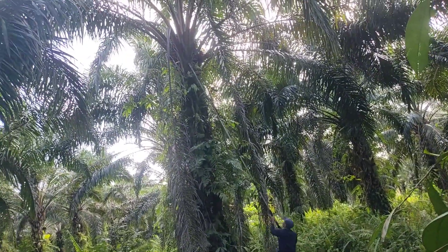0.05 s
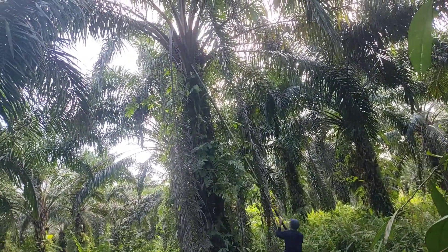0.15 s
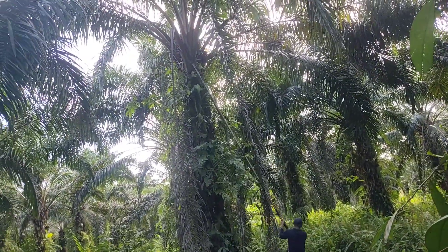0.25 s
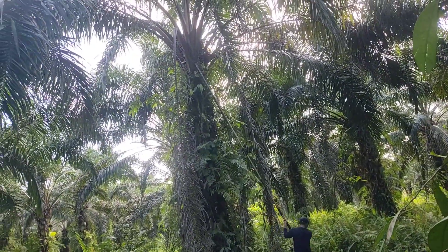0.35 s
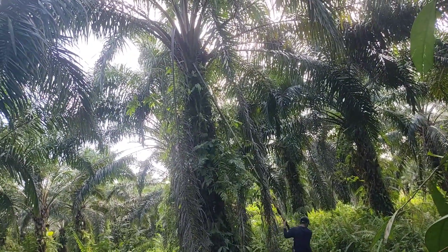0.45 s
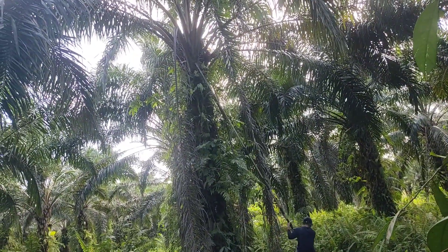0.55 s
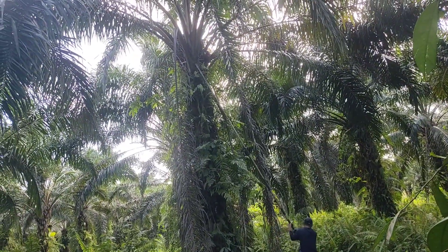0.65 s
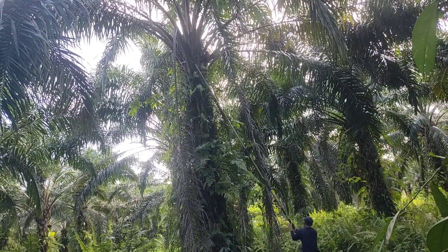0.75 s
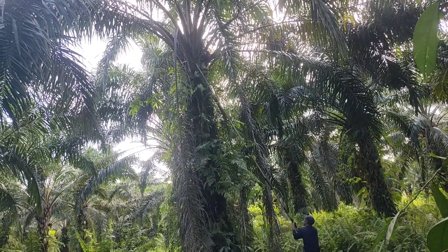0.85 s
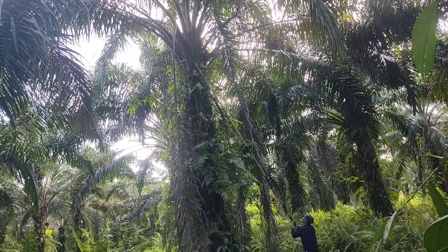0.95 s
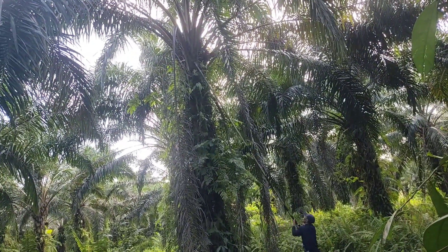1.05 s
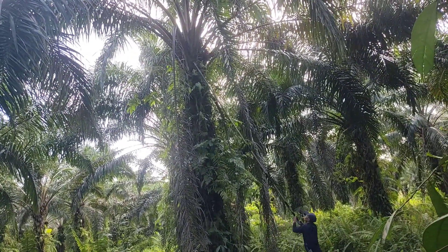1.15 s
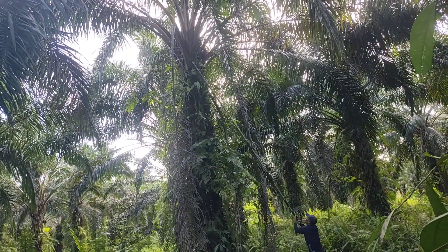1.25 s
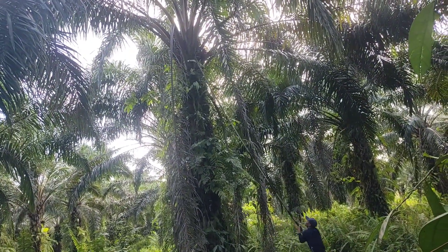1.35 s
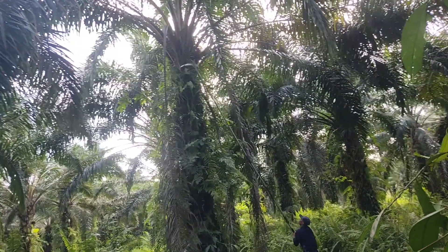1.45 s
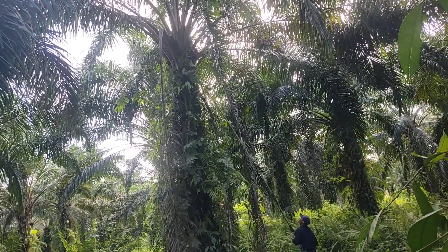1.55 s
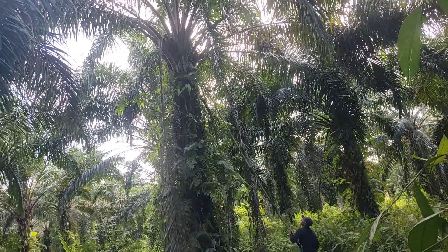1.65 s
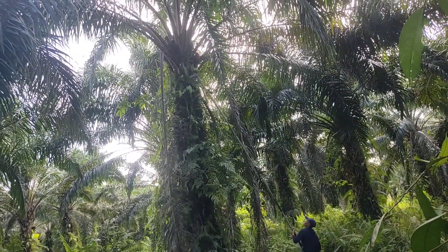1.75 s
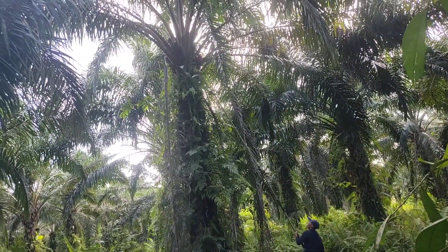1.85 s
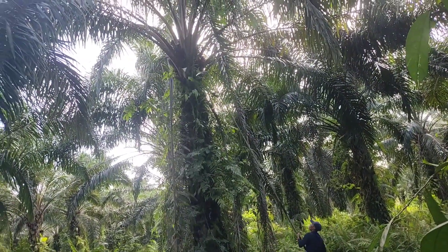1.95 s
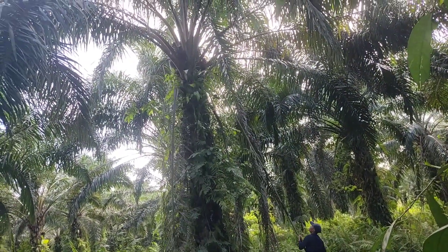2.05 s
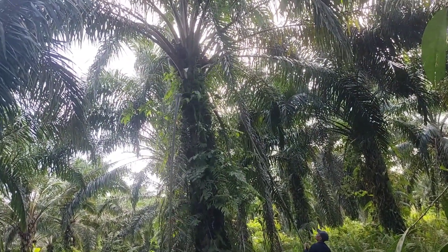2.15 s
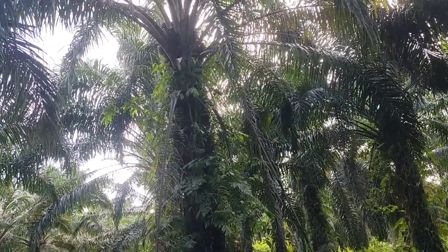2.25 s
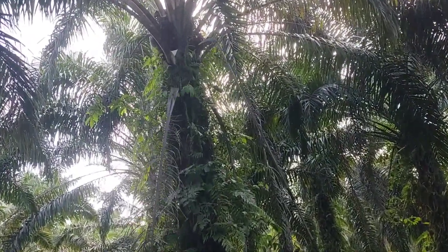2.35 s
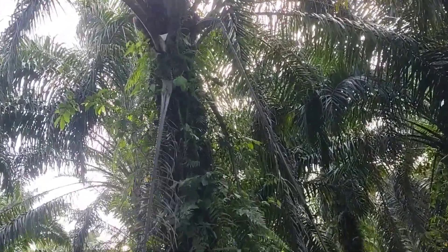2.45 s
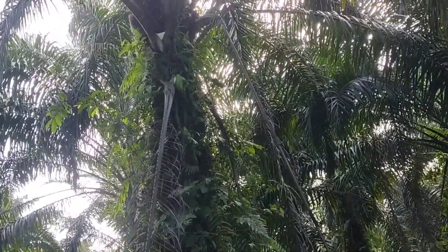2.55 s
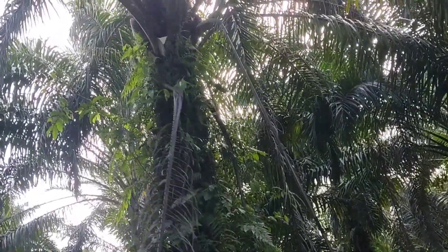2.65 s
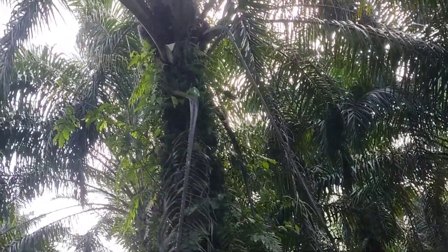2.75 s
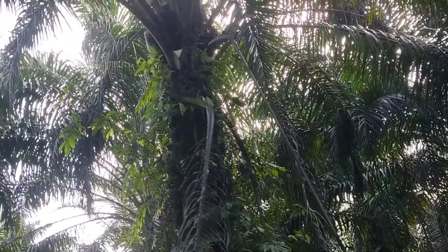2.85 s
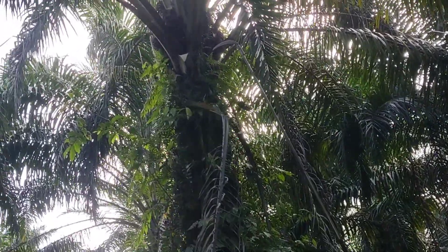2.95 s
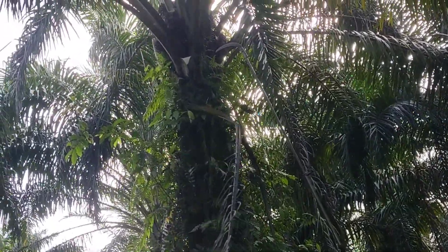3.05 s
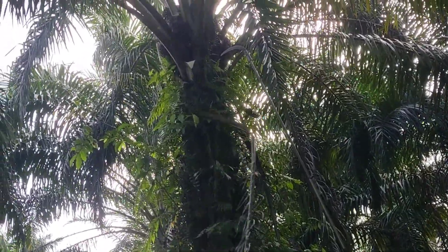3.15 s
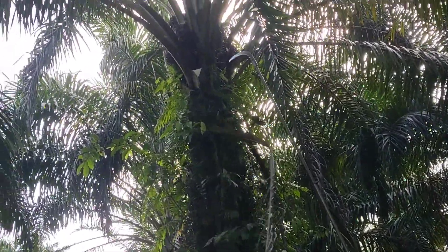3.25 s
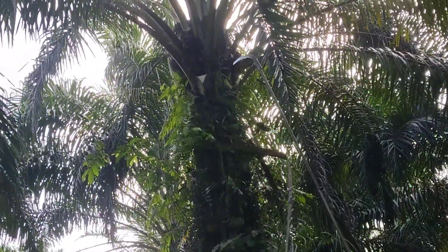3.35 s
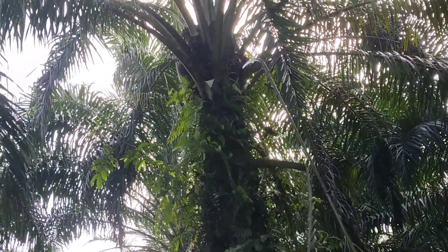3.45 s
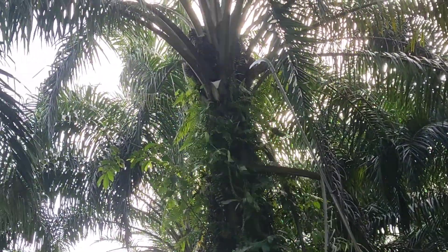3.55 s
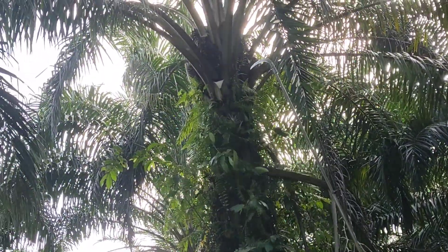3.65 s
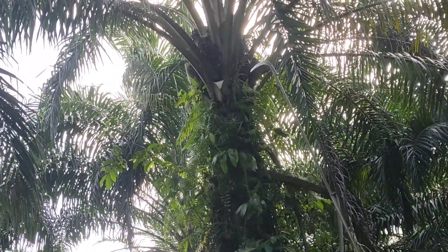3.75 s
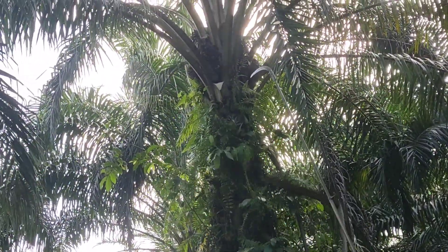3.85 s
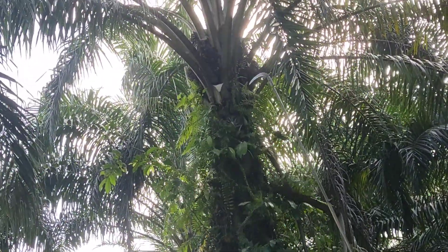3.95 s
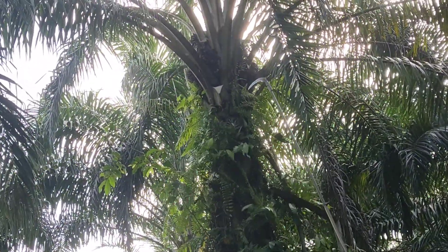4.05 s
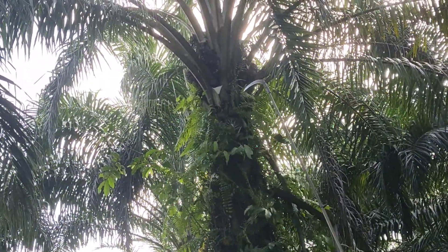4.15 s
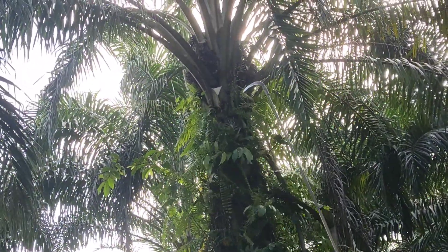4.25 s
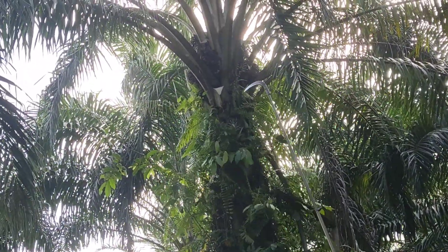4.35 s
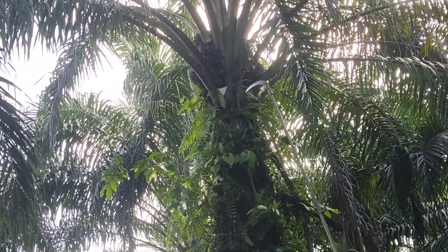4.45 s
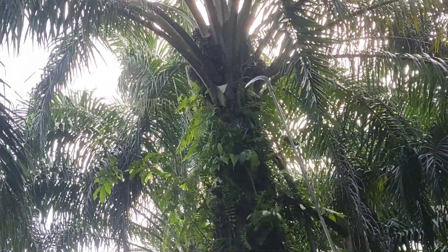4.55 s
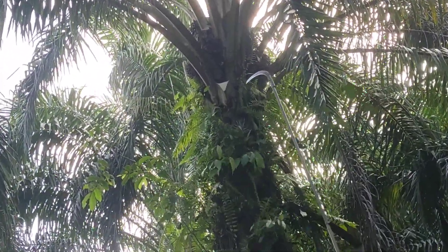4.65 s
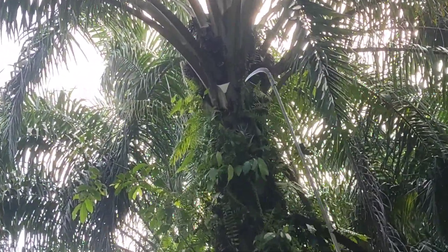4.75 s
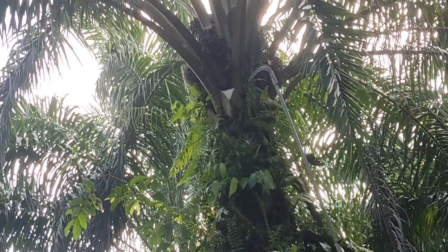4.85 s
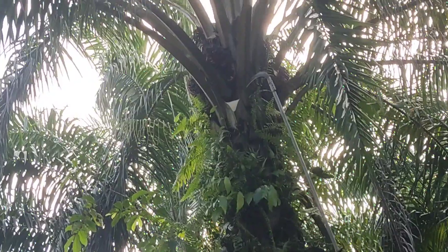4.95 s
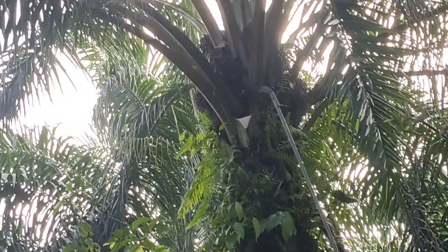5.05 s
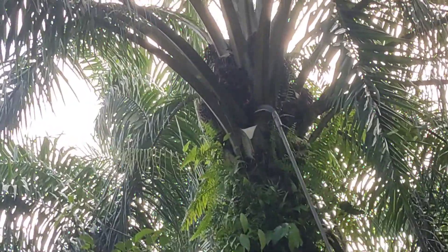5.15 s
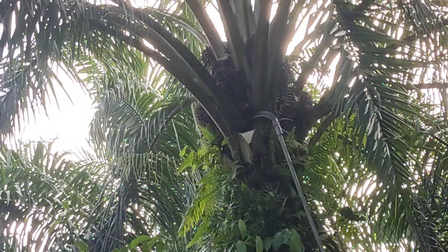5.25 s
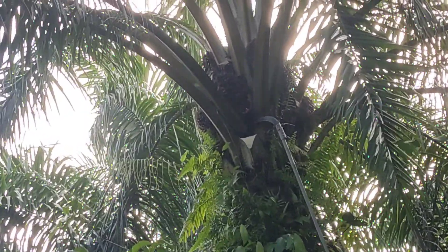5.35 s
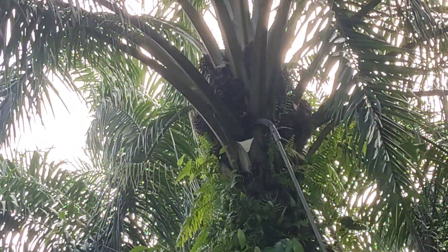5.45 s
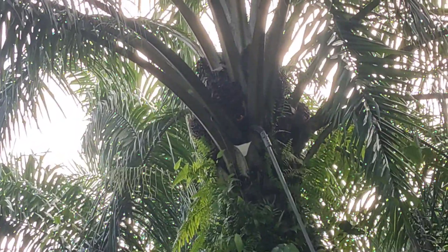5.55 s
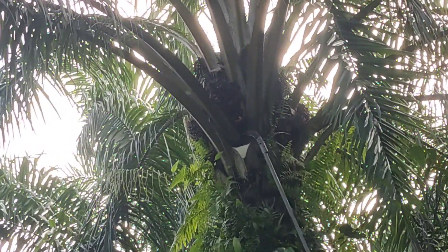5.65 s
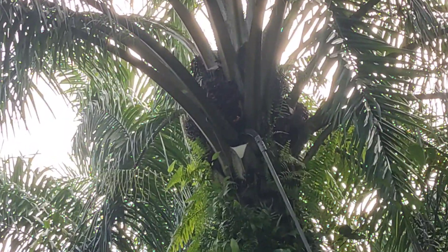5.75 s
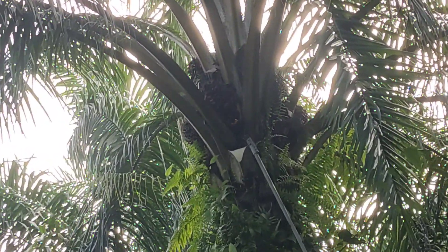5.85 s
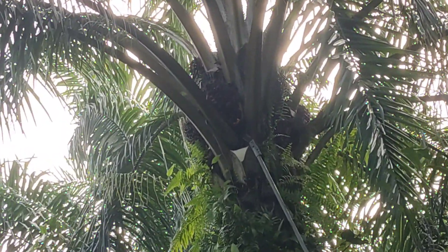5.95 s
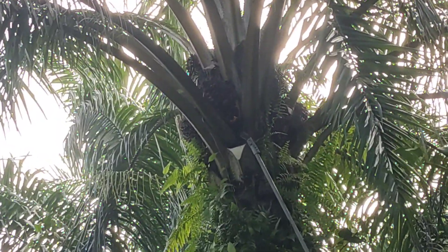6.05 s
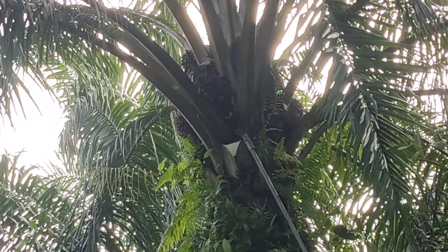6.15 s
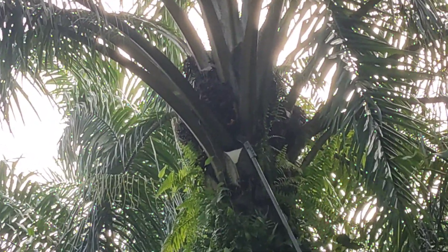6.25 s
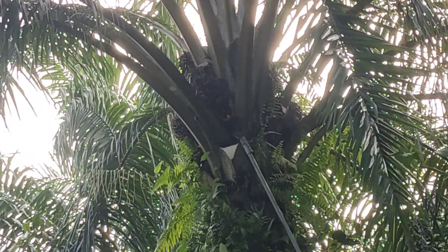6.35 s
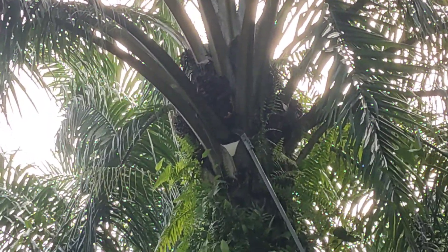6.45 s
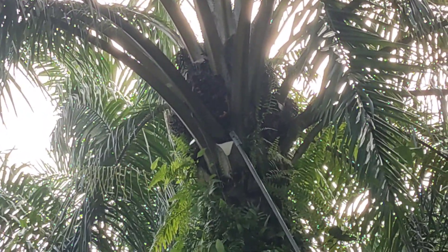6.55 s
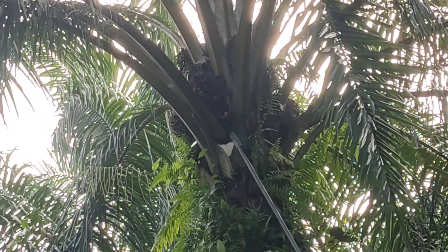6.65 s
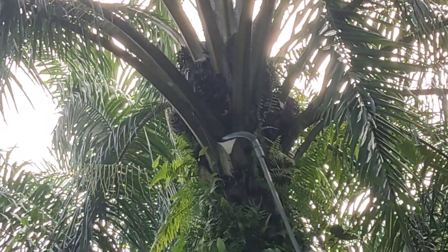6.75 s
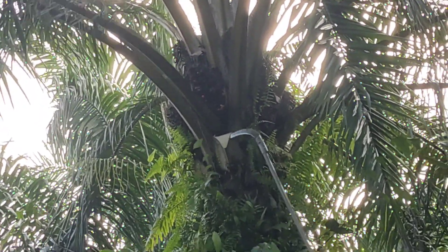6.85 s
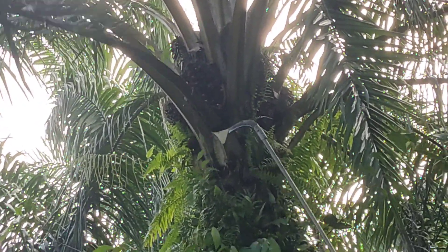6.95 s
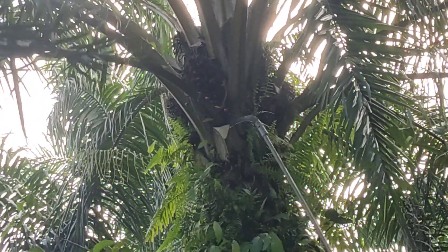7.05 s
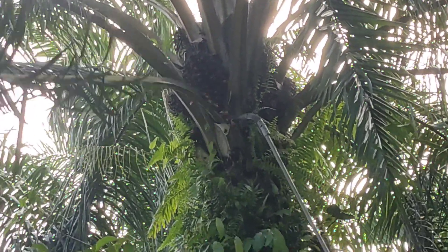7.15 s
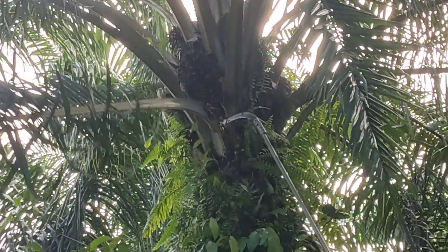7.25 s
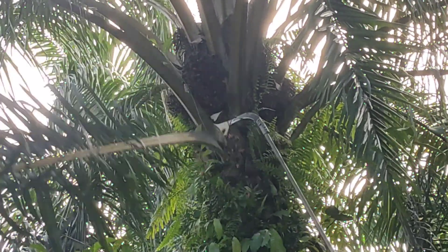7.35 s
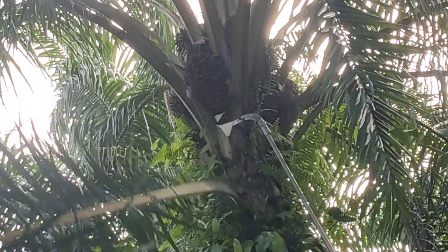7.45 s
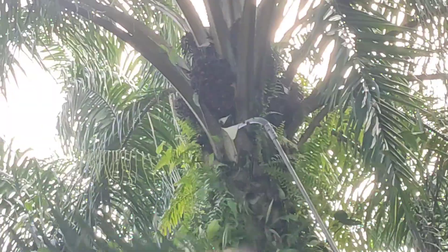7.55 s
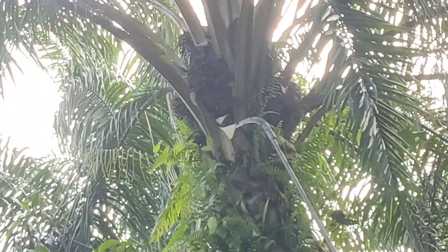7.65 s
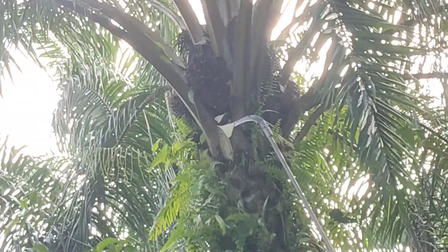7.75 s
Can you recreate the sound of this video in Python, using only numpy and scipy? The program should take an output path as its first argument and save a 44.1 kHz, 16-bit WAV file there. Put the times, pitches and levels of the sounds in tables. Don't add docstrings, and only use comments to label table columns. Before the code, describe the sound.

A steady, high, shimmering cicada drone fills a palm plantation throughout, with faint far-leaf hiss and very light wind. At 0.1 s a woody knock with a dull thump comes from the crown about ten metres off, then small faint taps. From 1.35 to 2.4 s the pole sickle bites: rapid dry ticks, crunching rips and bright snaps, loudest around 1.65 to 2.0 s, with brief metallic-woody ringing and rustling leaflets. Lighter clacks follow from 2.7, a thud at 3.3, and leafy rustle with sharp ticks and snaps from 3.6 to 4.6 s, including a hollow knock at 4.55. It quiets near 5 s, with soft scrapes, small splits and knocks until 6.5. At 6.7 to 7.0 s a dense, loud splintering tear breaks out with thumps, then leaves swish and rustle, with scattered knocks and a short scrape around 7.7 s. Short diffuse woodland reverberation; phone sound, little bass.

```python
import sys
import numpy as np
from scipy import signal
from scipy.fft import rfft, irfft, next_fast_len
from scipy.io import wavfile
from scipy.ndimage import uniform_filter1d, map_coordinates

SR = 44100
rng = np.random.default_rng(int(sys.argv[2]) if len(sys.argv) > 2 else 0)


def log_audio(samples):
    frames = np.atleast_2d(samples).T
    limited = np.clip(frames, -1, 1)
    pcm = np.round(limited * 32767).astype(np.int16)
    wavfile.write(sys.argv[1], SR, pcm)


def nominal_scale(level):
    x = np.asarray(level, float) / 20
    return 10 ** x


N = 344421
FAST = next_fast_len(N, True)

# (frequency [Hz], level [dB])
EDGE_COLOUR = [(4200, -29.5), (5300, -5), (6500, -8.5), (7500, -3), (8800, -10), (9600, -17.5),
               (10500, -26), (12500, -19.5), (14500, -22.5), (15800, -60)]
# (frequency [Hz], level [dB])
CRUNCH_COLOUR = [(250, -36), (600, -2), (1100, 3), (2200, 5), (3300, 8.5), (4300, 2), (6000, -34.5)]
# (frequency [Hz], common share [0-1])
CROWN_LIKENESS = [(100, 1), (1000, 0.78), (1500, 0.41), (2300, 0.65), (3500, 0.27), (6000, 0)]


def shape(table, size):
    hz, value = np.transpose(table)
    bins = np.maximum(np.fft.rfftfreq(size, 1 / SR), 1)
    return np.interp(np.log(bins), np.log(hz), value)


def colour(x, table):
    hz = np.fft.rfftfreq(FAST, 1 / SR)
    inside = (hz > table[0][0]) * (hz < table[-1][0])
    y = irfft(rfft(x, FAST) * nominal_scale(shape(table, size=FAST)) * inside, FAST)[..., :N]
    return y / np.sqrt(np.mean(y ** 2))


def causal(db):
    cepstrum = irfft(np.log(nominal_scale(db)))
    half = cepstrum.shape[-1] // 2
    cepstrum[..., 1:half] *= 2
    cepstrum[..., half + 1:] = 0
    return np.exp(rfft(cepstrum))


def walk(rate):
    k = int(SR / rate)
    held = np.repeat(rng.standard_normal(N // k + 1), k)
    return 0.96 * uniform_filter1d(uniform_filter1d(held, k), k)[:N]


def grains(rate, spread_db):
    out = np.zeros(3 * N)
    at = rng.integers(3 * N, size=int(3 * N * rate / SR))
    sign, size = rng.standard_normal((2, len(at)))
    out[at] = sign * nominal_scale(spread_db * size)
    return out.reshape(3, N)


def pair(three, like):
    share = np.clip(shape(like, size=FAST), 0, 1)
    spec = rfft(three, FAST)
    return irfft(np.sqrt(share) * spec[0] + np.sqrt(1 - share) * spec[1:], FAST)[:, :N]


def ring(modes, weight, wobble, size):
    hz, db, t60 = np.transpose(modes)
    decay = np.log(1000) / (t60 * SR)
    pole = np.exp(2j * np.pi * hz * wobble / SR - decay)[..., None]
    delay = np.exp(-2j * np.pi * np.arange(size // 2 + 1) / size)
    resonance = pole.imag * delay / ((1 - pole * delay) * (1 - pole.conj() * delay))
    return np.sum((nominal_scale(db) * weight)[..., None] * resonance, axis=1)


def peak_one(x):
    return x / np.max(np.abs(x), axis=-1, keepdims=True)


def place(times, sounds):
    size = sounds.shape[-1]
    out = np.zeros(N + size)
    for start, sound in zip(times, sounds):
        out[int(start * SR):int(start * SR) + size] += sound
    return out[:N]


def blow_rows():
    # (time [s], peak [dB], centre [Hz], length [ms], thud [dB])
    thumps = [(.094, -28, 804, 13.8, -10.5), (.347, -50, 1064, 7.4, -8), (.805, -63.5, 590, 14.3, 14),
              (.991, -51, 450, 2.9, -6), (1.187, -47.5, 1563, 7.7, 3.5), (1.349, -35, 458, 14.1, 6),
              (2.222, -31, 1300, 11.2, 2.5), (2.277, -38.5, 997, 11.1, 5), (3.19, -48.5, 480, 14, -1.5),
              (3.259, -38, 2260, 6.2, -1.5), (3.337, -33, 500, 8, 0), (3.577, -44, 2087, 7.2, 0),
              (4.935, -51, 2310, 45, 1.5), (5.048, -59, 450, 5.6, 11.5), (5.455, -52, 764, 12, -3.5),
              (6.14, -36.5, 833, 14.6, -2.5), (6.39, -53, 400, 7.6, 8.5), (6.644, -45, 1198, 35, -3.5),
              (6.96, -25.5, 1047, 16, -6), (7.124, -43, 2900, 13.3, -7), (7.352, -39.5, 600, 12.7, -3),
              (7.742, -36.5, 2950, 12.5, -2)]
    # (time [s], peak [dB], centre [Hz], length [ms], crack [dB])
    snaps = [(1.444, -30.5, 2230, 20.7, -15), (1.743, -20, 2904, 17.06, -12), (1.858, -18, 1750, 24, -14.5),
             (1.931, -21.5, 2830, 5.4, -3), (2.016, -16.5, 2765, 2.53, -10), (2.16, -28.5, 2455, 8.3, 0),
             (2.362, -34.5, 2870, 17.4, -0.5), (3.815, -31, 2727, 2.4, -3.5), (4.186, -35.5, 3020, 6, -2),
             (4.346, -23, 2582, 3.5, -2), (4.389, -31, 2444, 7, 1), (5.32, -40, 2990, 12.6, -4.5),
             (5.634, -34.5, 1055, 17.6, -10.5), (5.761, -40, 1095, 15.5, -13.5), (6.734, -24, 2400, 14, -8),
             (6.836, -24.5, 2750, 10.5, -15.5), (6.857, -17.5, 2130, 9, -15.5),
             (6.873, -18, 793, 13.2, -12), (6.937, -15, 2133, 16, -11), (7.26, -35, 900, 8.4, -6),
             (7.703, -32.5, 2240, 37, -8.5)]
    # (time [s], peak [dB], centre [Hz], length [ms])
    wood_knocks = [(1.129, -41, 931, 13.4), (1.889, -28, 1069, 18.3), (2.849, -47.5, 788, 6.1),
                   (3.073, -39.5, 795, 7.9), (4.272, -44, 763, 9.3), (4.553, -27, 732, 7.9),
                   (4.567, -32, 780, 3.78), (5.207, -52.5, 1002, 11.7), (5.233, -47, 1030, 7.7),
                   (5.251, -50.5, 1010, 14.7), (5.355, -43.5, 1005, 16), (6.618, -49.5, 750, 13.7),
                   (7.3, -39, 798, 8.5), (7.581, -35.5, 739, 8.8)]
    # (time [s], peak [dB], centre [Hz], length
    # [ms])
    ticks = [(.263, -50, 2010, 8), (.304, -50, 2210, 5), (1.477, -24.5, 2060, 39.5),
             (1.57, -16.5, 1600, 8.2), (1.602, -25, 2610, 17.4), (1.653, -13, 1750, 9),
             (1.685, -19, 1800, 8.4), (2.316, -30, 2965, 5.6), (2.344, -28, 2390, 2.4),
             (2.412, -39, 1510, 22), (2.719, -36, 1800, 22), (2.935, -30, 2200, 24), (3.402, -36, 2360, 14),
             (3.614, -29, 2970, 4), (3.762, -37, 2330, 11.6), (3.981, -25, 2610, 2.13),
             (4.082, -36.5, 3030, 5.7), (4.166, -34, 2320, 6.3), (4.409, -35.5, 2740, 12),
             (4.552, -37, 2740, 6), (5.231, -38, 2310, 9), (5.529, -51, 2610, 5.1), (5.925, -46, 2370, 23),
             (6.521, -46, 2410, 6.5), (7.041, -28.5, 1900, 9.2), (7.064, -27, 2000, 6.8),
             (7.127, -39, 2910, 5.2),
             (1.426, -37, 2160, 10.4), (1.515, -28, 2400, 8), (1.545, -23.5, 2200, 8.2),
              (1.554, -24.5, 650, 8.3), (1.649, -20.5, 1700, 2.1), (1.838, -36, 2970, 7.4),
              (2.048, -36, 3280, 6.2), (2.364, -34, 780, 5.7), (2.392, -38, 3110, 6),
              (3.333, -38.5, 800, 4.4), (5.251, -37, 2370, 6.2), (5.292, -49.5, 2410, 8),
              (5.354, -36, 2180, 7.7), (5.604, -37.5, 2800, 3), (5.652, -40.5, 1800, 12.5),
              (5.755, -37, 2770, 14.7), (6.024, -37.5, 2300, 4), (6.098, -34.5, 2700, 4),
              (6.104, -38.5, 1100, 7.5), (6.143, -32.5, 2700, 10.3), (6.274, -48, 2280, 8),
              (6.823, -34.5, 1000, 8.2), (6.889, -25, 2200, 5.9), (6.911, -20.5, 900, 14.7),
              (6.922, -22, 1800, 8.2), (6.949, -20, 2490, 2.9), (6.985, -27.5, 2200, 9.6),
              (7.395, -38, 2480, 6), (7.432, -43, 2160, 6), (7.453, -45.5, 2600, 6.1),
              (7.558, -40.5, 1940, 7.7)]
    thump_mix = dict(spot_db=-2, crunch_db=12.5, crack_db=-27)
    snap_mix = dict(spot_db=-6.5, crunch_db=11, thud_db=-19.5)
    knock_mix = dict(spot_db=5.5, crunch_db=8.5, thud_db=-31.5, crack_db=-32)
    tick_mix = dict(spot_db=-7, crunch_db=11, thud_db=-24, crack_db=-31)

    rows = [(*r[:4], dict(thump_mix, thud_db=r[4])) for r in thumps]
    rows += [(*r[:4], dict(snap_mix, crack_db=r[4])) for r in snaps]
    rows += [(*r, knock_mix) for r in wood_knocks]
    rows += [(*r, tick_mix) for r in ticks]
    shares = ("spot_db", "crunch_db", "thud_db", "crack_db")
    return np.array([(*r[:4], *(r[4][k] for k in shares)) for r in rows]).T[..., None]


def knocks(reach=0.434, size=4096):
    # (frequency [Hz], level [dB], decay time T60 [s])
    pole_modes = [(568.4, 1, 0.0348), (773, 0.5, 0.0535), (1113.3, -3, 0.036), (1547, -1, 0.0356),
                  (1700, -2.5, 0.043), (2100, 0.5, 0.029), (2320, 3.5, 0.0326), (2722, 5.5, 0.029),
                  (2950, 3, 0.023), (3303, 2.5, 0.0254), (3700, 2, 0.022)]
    # (frequency [Hz], level [dB], decay time T60 [s])
    thud_modes = [(193, 3, 0.039), (317, 14.5, 0.0126)]
    bend_cycles = 1.6015

    s, peak_db, hz, crunch_ms, spot_db, splinter_db, thud_db, crack_db = blow_rows()
    ms = 1000 * np.arange(size) / SR
    bins = np.fft.rfftfreq(size, 1 / SR)
    chance = rng.standard_normal((len(s), 3 * size + len(pole_modes)))
    length = np.clip(0.673 * crunch_ms, 1, 40)
    build_up = 1 - np.exp(-ms / (0.0844 * length))
    click = 12.1 / (length + 2.0) * np.exp(-ms / 0.662)
    envelope = build_up * np.exp(-(ms / length) ** 1.27) + click
    slips = rfft(envelope * chance[:, :size] * nominal_scale(4.25 * chance[:, size:2 * size]))
    slips *= np.exp(-2j * np.pi * bend_cycles * np.log(np.clip(bins, 150, 5000) / 150))

    distance = np.log(np.transpose(pole_modes)[0] / hz)
    near = 0.028 + np.exp(-distance ** 2 / reach ** 2 / 2)
    body_ring = ring(pole_modes, near, 1 + 0.025 * chance[:, 3 * size:], size)
    body = peak_one(irfft(slips * body_ring, size))
    spot_ring = ring([(0.9965, 0, 0.019)], np.ones_like(hz), hz, size) ** 2
    spot = peak_one(irfft(slips * 1j * bins / hz * spot_ring, size))
    octaves = np.log2(np.maximum(bins, 50) / hz)
    crunch_db = shape(CRUNCH_COLOUR, size=size)
    crunch_db = crunch_db - 5 * np.maximum(-octaves, 0) - 14 * np.maximum(octaves, 0)
    crunch = peak_one(irfft(slips * causal(crunch_db), size))
    thud_ring = ring(thud_modes, np.ones((len(s), 2)), 1 + 0.086 * chance[:, :2], size)
    thud = peak_one(irfft(slips * thud_ring, size))
    edge = rfft(envelope ** 2 * chance[:, 2 * size:3 * size]) * causal(shape(EDGE_COLOUR, size=size))
    crack = peak_one(irfft(edge, size))

    blows = peak_one(body + nominal_scale(spot_db) * spot + nominal_scale(splinter_db) * crunch)
    blows = blows + nominal_scale(thud_db - 12.0) * thud + nominal_scale(crack_db + 9.5) * crack
    return place(s[:, 0], nominal_scale(peak_db) * blows)


def rings(size=8192):
    # (time [s], peak [dB], frequency [Hz], drive [ms], decay time T60 [s])
    blade_notes = [(.098, -33, 1005, 12, .07), (.101, -36, 540, 15, .08), (1.348, -39, 470, 8, .05),
                   (1.446, -30, 2145, 6, .04), (1.488, -28, 2125, 30, .05), (1.606, -21, 3295, 5, .03),
                   (1.663, -29, 1115, 15, .05), (1.754, -31, 785, 15, .04), (1.854, -26, 605, 12, .04),
                   (1.864, -23, 1205, 15, .05), (2.015, -16, 2785, 2.2, 0.021), (2.944, -44, 788, 12, .3),
                   (2.948, -46, 3295, 15, .15), (2.976, -43, 2620, 15, .04), (3.338, -32, 470, 6, .04),
                   (3.346, -36, 768, 5, .09), (4.344, -31, 5950, 3, .02), (4.552, -38, 3360, 5, .04),
                   (5.531, -50, 2285, 10, .09), (5.541, -54, 1175, 15, .15), (5.607, -41, 1055, 10, .07),
                   (5.637, -42, 1115, 12, .13), (5.751, -38, 2805, 15, .04), (5.769, -45, 1085, 15, .13),
                   (6.021, -46, 1155, 15, .08), (6.074, -39, 3215, 25, .05), (6.087, -39, 2335, 15, .05),
                   (6.125, -43, 1155, 12, .05), (6.227, -46, 2745, 8, .04), (6.304, -46, 2765, 12, .05),
                   (6.524, -44, 2715, 15, .06), (6.736, -27, 2725, 5, .03), (6.835, -25, 2745, 6.2, 0.0305),
                   (6.86, -19, 2185, 8, .04), (6.863, -27, 1115, 10, .05), (6.871, -21, 778, 8, 0.042),
                   (6.936, -18, 2125, 11.6, 0.049), (6.961, -24.5, 1105, 6.3, 0.035),
                   (6.997, -34, 1115, 6.2, 0.031), (7.016, -36, 2205, 19.6, .05)]
    # (time [s], peak [dB], frequency [Hz], decay time T60 [s])
    drum_notes = [(0.101, -39.5, 202.3, 0.064), (0.804, -49, 238, 0.058), (1.191, -48.5, 242, 0.059),
                  (1.349, -34, 227.3, 0.066), (1.557, -33, 389.2, 0.069), (1.658, -34, 202, 0.052),
                  (1.857, -34.5, 479, 0.053), (2.064, -45.5, 223, 0.056), (2.177, -38, 421.5, 0.063),
                  (2.237, -41, 221.3, 0.056), (2.276, -42, 286.9, 0.059), (3.196, -49.5, 304, 0.068),
                  (3.264, -45.5, 251, 0.057), (3.339, -29.5, 293.4, 0.051), (3.444, -46.5, 217, 0.055),
                  (3.579, -37.5, 353.4, 0.052), (3.727, -50.5, 233.5, 0.057), (4.942, -50.5, 218.3, 0.063),
                  (5.053, -49, 263.8, 0.06), (5.331, -48, 212.3, 0.061), (5.612, -49.5, 365.5, 0.055),
                  (6.082, -47, 350.7, 0.062), (6.139, -41, 199, 0.066), (6.393, -44, 259.5, 0.052),
                  (6.717, -45.5, 240, 0.063), (6.834, -34.5, 350, 0.064), (6.849, -28.5, 217.8, 0.071),
                  (6.939, -30, 327, 0.063), (6.98, -31, 213.3, 0.063), (7.349, -45, 406.6, 0.062),
                  (7.686, -42.5, 370.2, 0.06), (7.733, -40, 216, 0.059)]
    drum_db, drum_drive_ms = 3.5, 4
    ring_db, rough, flutter_ms = -6, 1.0, 3.987
    steady_s = .05

    drums = [(s, db + drum_db, hz, drum_drive_ms, t60) for s, db, hz, t60 in drum_notes]
    s, peak_db, hz, drive_ms, t60 = np.transpose(blade_notes + drums)[..., None]
    t = np.arange(size) / SR
    rub = np.exp(-(1000 * t / drive_ms) ** 2)
    decay = np.exp(-np.log(1000) * t / t60)
    swell = peak_one(signal.fftconvolve(rub, decay, axes=1)[:, :size])
    span = int(flutter_ms * SR / 1000)
    waver = uniform_filter1d(rng.standard_normal((len(s), 2, size)), span) * np.sqrt(span / 2)
    waver = waver * rough * np.minimum(steady_s / t60, 1)[..., None]
    phase = 2 * np.pi * hz * t
    notes = swell * ((1 + waver[:, 0]) * np.sin(phase) + waver[:, 1] * np.cos(phase))
    return place(s[:, 0], nominal_scale(peak_db + ring_db) * peak_one(notes))


def tearing():
    # (start [s], hold [s], release per 20 dB [s], level [dB], hiss over level [dB])
    tears = [(1.415, .03, 0.21, -42, 3), (1.452, 0.0992, 0.1031, -34.5, 4.5),
             (1.641, 0.0102, 0.07, -39, -12.5), (1.832, 0.0232, 0.0734, -35, -0.5),
             (1.95, 0.077, 0.2972, -47.5, 11), (3.573, .015, .04, -53, 5), (4.145, 0.011, 0.044, -47, 4),
             (5.21, .01, 0.11, -56.5, 4), (5.298, 0.029, 0.095, -55.5, -1), (5.588, 0.0282, 0.01, -52, 1.5),
             (5.73, 0.0084, 0.0437, -47.5, 1.5), (5.998, 0.0084, .08, -52, 1.5),
             (6.064, 0.053, 0.02, -49, 0.5), (6.25, 0.0327, 0.09, -58, -3), (6.705, .008, .09, -44, 4),
             (6.816, 0.0466, 0.06, -32, 4.5), (6.899, .015, .09, -34, 6), (6.97, .01, .14, -42, 6.5),
             (7.665, .03, 0.14, -44, 7)]
    attack_s, stalk_db, stalk_per_hiss = 0.03573, -2.5, -0.312

    t = np.arange(N) / SR
    power, drag = np.zeros((3, N)), np.zeros(N)
    for start, hold_s, release_s, db, hiss_db in tears:
        span = slice(int(start * SR), int(start * SR) + SR // 2)
        after = np.maximum(t[span] - start - attack_s - hold_s, 0)
        rise = np.clip((t[span] - start) / attack_s, 0, 1) ** 2
        pull = rise * nominal_scale(db - 20 * after / release_s)
        layers = nominal_scale(np.array([stalk_db + stalk_per_hiss * hiss_db, 0, hiss_db]))
        power[:, span] += np.outer(layers, pull) ** 2
        drag[span] += pull ** 2
    return power, drag


def sing(x, size=16384):
    # (frequency [Hz], level [dB], decay time T60 [s])
    blade_modes = [(582, 0, 0.057), (777, -1, 0.073), (1120.4, -1, 0.064), (1546, -0.5, 0.0576),
                   (1700, -1, 0.0594), (2110.4, 2, 0.051), (2320, 3.5, 0.052), (2723, 1.5, 0.0376),
                   (2950, -1, 0.0466), (3222.6, 0.5, 0.0484), (3664, -2, 0.047), (4194, -2, 0.045)]
    response = irfft(ring(blade_modes, np.ones((1, len(blade_modes))), 0.9967, size), size)
    y = signal.fftconvolve(x, response)[:, :N]
    return y * np.sqrt(np.mean(x ** 2) / np.mean(y ** 2))


def fronds():
    # (time [s], leaflet rustle [dB])
    shaking = [(0.0, -69), (1.22, -73), (1.41, -53), (1.61, -45.5), (1.8, -48), (2.11, -43.5),
               (2.42, -49.5), (2.54, -60), (3.26, -62), (3.55, -48.5), (3.83, -55), (4.44, -51),
               (4.61, -63.5), (5.0, -70.5), (5.5, -66), (5.95, -61.5), (6.2, -61.5), (6.36, -66.5),
               (6.65, -70), (6.94, -48.5), (7.81, -47.5)]
    # (frequency [Hz], level [dB])
    stalk_colour = [(120, -40), (170, 5), (300, -6), (480, 1), (770, 4), (1100, 1.5), (1300, -0.5),
                    (1700, -0.5), (2000, -4)]
    # (frequency [Hz], level [dB])
    leaflet_colour = [(1300, -10), (1700, -8.5), (2200, 0), (2900, 1), (3400, -2), (4000, -3), (4800, -4.5),
                      (5300, -50.5)]
    # (frequency [Hz], level [dB])
    sway_colour = [(60, 6), (130, 4), (180, -0.5), (260, -1), (380, -1.5), (520, -10), (800, -39)]
    middling_db = -55
    stalk_at_db, stalk_slope = -63.5, 0.722
    edge_at_db, edge_slope = -51, 1.061
    sway_at_db, sway_slope = -72.5, 1.444
    scrape_db = -1.5

    shake_db = np.interp(np.arange(N) / SR, *np.transpose(shaking))
    over_db = shake_db - middling_db
    stalk_db = stalk_at_db + stalk_slope * over_db
    edge_db = edge_at_db + edge_slope * over_db
    tear_power, drag = tearing()
    gain = np.sqrt(nominal_scale(2 * np.array([stalk_db, shake_db, edge_db])) + tear_power)
    crackle_db = 1.455 * walk(120) + 2.294 * walk(45) + .4 * walk(16)

    stalk = colour(pair(grains(2500, 1.43), CROWN_LIKENESS), stalk_colour)
    stalk = stalk * gain[0] * nominal_scale(crackle_db + 0.5 * walk(30))
    slips = pair(grains(9000, 2.28), CROWN_LIKENESS)
    leaflets = colour(slips, leaflet_colour) * gain[1] * nominal_scale(crackle_db)
    leaf_edges = colour(slips, EDGE_COLOUR) * gain[2] * nominal_scale(0.976 * crackle_db)
    cracks = colour(pair(grains(45, 3.4), CROWN_LIKENESS), CRUNCH_COLOUR) * nominal_scale(shake_db - 16)
    rub = colour(pair(grains(700, 2.86), CROWN_LIKENESS), CRUNCH_COLOUR)
    scrape = nominal_scale(scrape_db) * sing(rub * np.sqrt(drag) * nominal_scale(crackle_db))
    sway = colour(pair(grains(600, 2.77), CROWN_LIKENESS), sway_colour)
    sway = sway * nominal_scale(sway_at_db + sway_slope * over_db + 2.4 * walk(14))
    return sway + scrape + cracks + stalk + leaflets + leaf_edges


def grove(x):
    t60_s, tail_db = 0.22, -12.5
    roam_samples = 3.07
    t = np.arange(SR // 2) / SR
    tail = rng.standard_normal((3, len(t))) * np.exp(-np.log(1000) * t / t60_s) * (t > .004)
    tail /= np.sqrt(np.sum(tail ** 2, axis=1, keepdims=True))
    right = map_coordinates(x, [np.arange(N) + roam_samples * walk(5)], order=3, mode="mirror")
    scattered = pair(signal.fftconvolve(x[None], tail)[:, :N], CROWN_LIKENESS)
    return np.array([x, right]) + nominal_scale(tail_db) * scattered


def path(x):
    # (centre [Hz], width [Hz], lift [dB])
    reflections = [(450, 60.5, -2), (939, 49.3, -3.5), (1113, 86, 2.5), (1285.7, 54.2, -6.5),
                   (1859, 71.3, -4), (2130, 101, 2), (3952, 307, -2.5)]
    hz = np.fft.rfftfreq(FAST, 1 / SR)
    db = sum(lift_db * np.exp(-((hz - centre) / spread) ** 2 / 2) for centre, spread, lift_db in reflections)
    return irfft(rfft(x, FAST) * nominal_scale(db), FAST)[:, :N]


def cicadas():
    # (frequency [Hz], level [dB])
    chorus_colour = [(4400, -60), (4950, -15), (5600, -2), (6100, -4), (6350, -9), (6600, -4), (6900, -2),
                     (7350, 2), (8000, -3.5), (8800, -10.5), (9500, -23), (10400, -116), (11500, -28.5),
                     (12500, -22.5), (13800, -24), (15200, -29)]
    throb_db = .5 * walk(1.405) + np.array([0.83 * walk(70) for _ in range(2)])
    return colour(grains(12000, 1.18)[1:], chorus_colour) * nominal_scale(-43.5 + throb_db)


def air():
    # (frequency [Hz], level [dB])
    air_colour = [(100, 6), (200, 10), (500, -1), (1270, -15), (2200, -6), (3200, -7.5), (3900, -14),
                  (4500, -13), (5000, 1.5)]
    # (frequency [Hz], common share [0-1])
    diffuse_likeness = [(60, 0.3), (250, 0.21), (1000, 0.133), (2000, 0.053), (5000, 0.015)]
    hiss = colour(pair(rng.standard_normal((3, N)), diffuse_likeness), air_colour)
    return hiss * nominal_scale(-66.5 + 0.47 * walk(2.82) + 0.87 * walk(4.5))


def wind():
    # (frequency [Hz], level [dB])
    wind_colour = [(2, 3.5), (10, 2), (28, -6), (60, -13.5), (120, -16), (220, -29)]
    puffs_db = 2.62 * walk(2.486)
    return colour(rng.standard_normal((2, N)), wind_colour) * nominal_scale(-62 + puffs_db)


def scene():
    crown = grove(knocks() + rings()) + fronds()
    return path(crown) + cicadas() + air()


def roll_off(x):
    return signal.sosfilt(signal.butter(12, 15700, fs=SR, output="sos"), x)


def record(dry):
    # (frequency [Hz], left minus right [dB])
    port_difference = [(40, 7.5), (250, 11), (700, 8.5), (1500, 4), (2300, 14), (3900, 8.5), (5600, 13),
                       (6500, 4), (7400, -5), (9500, -1), (12000, 9), (15000, 8.5)]
    bass_cut_hz, left_lag_samples = 164.3, 2.515

    ratio = nominal_scale(shape(port_difference, size=FAST))
    late = np.exp(-2j * np.pi * np.fft.rfftfreq(FAST) * left_lag_samples)
    gains = 2 * np.array([ratio * late, np.ones_like(ratio)]) / np.sqrt(1 + ratio ** 2)
    bass_cut = signal.butter(6, bass_cut_hz, "high", fs=SR, output="sos")
    heard = signal.sosfilt(bass_cut, dry) + wind()
    mix = irfft(rfft(heard, FAST) * gains, FAST)[:, :N]
    return roll_off(mix)


dry = scene()
out = record(dry)
log_audio(out)
```